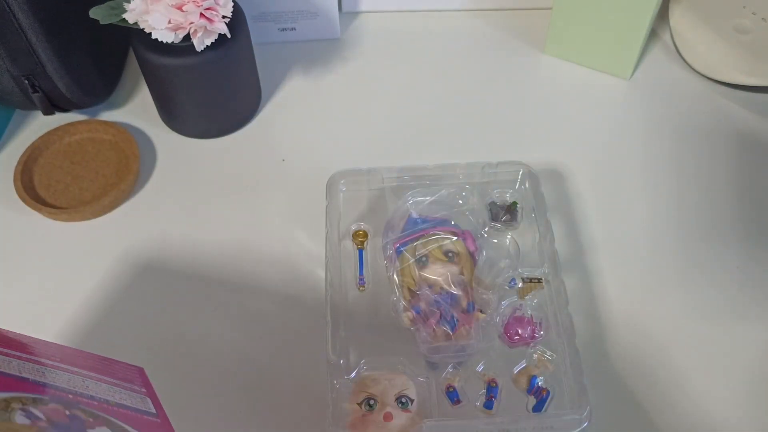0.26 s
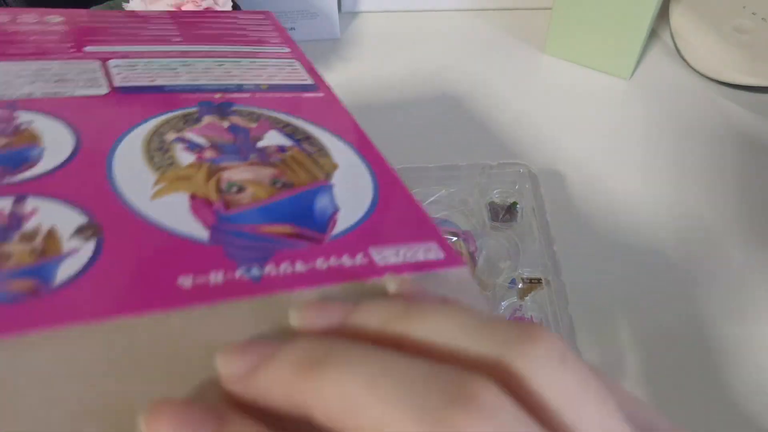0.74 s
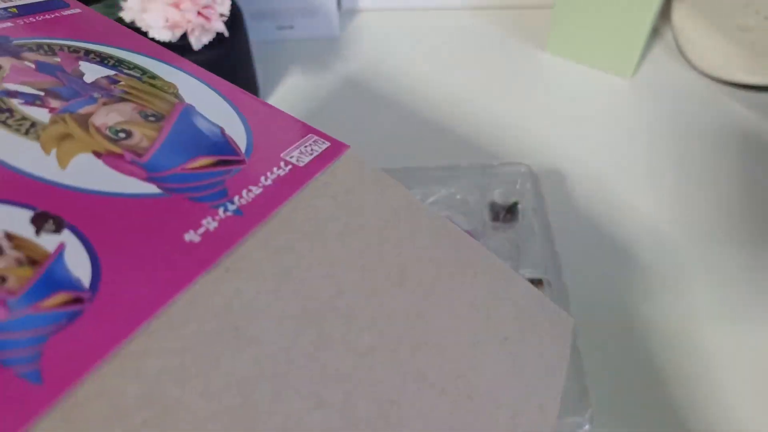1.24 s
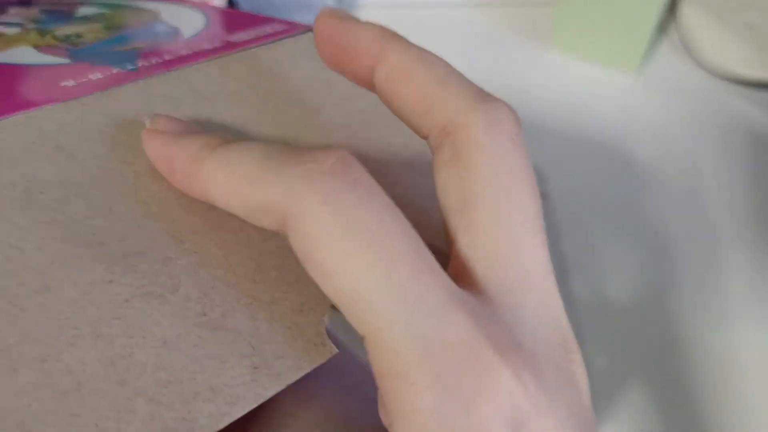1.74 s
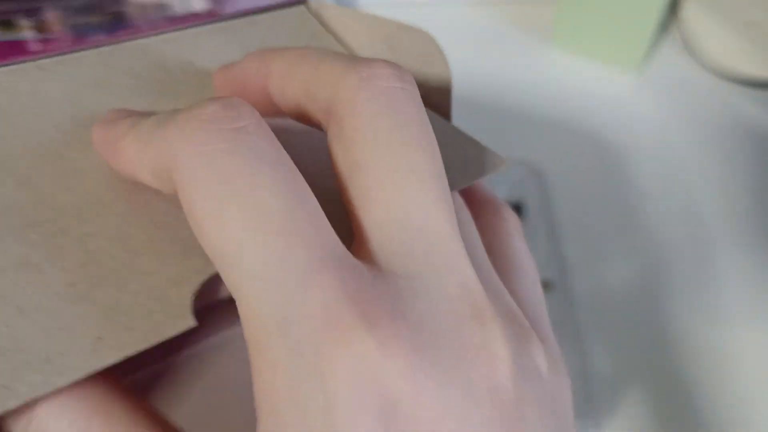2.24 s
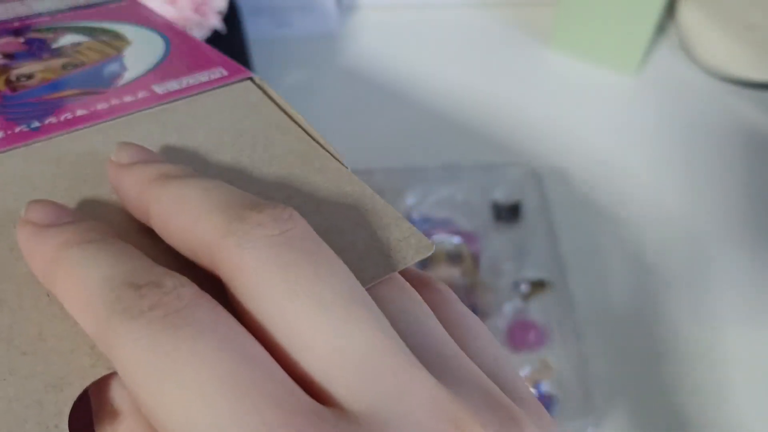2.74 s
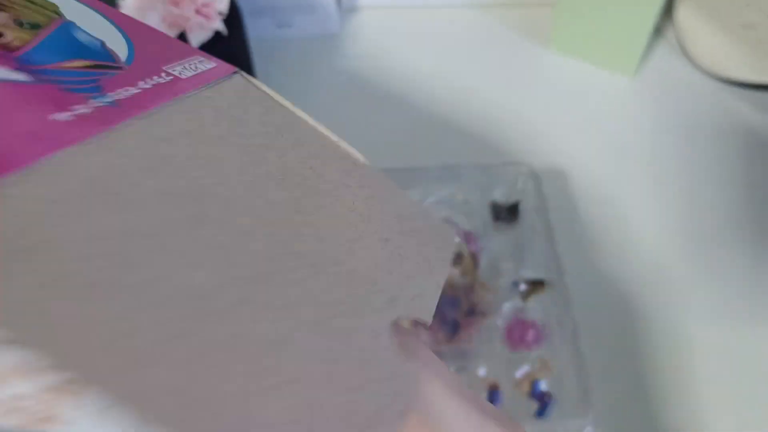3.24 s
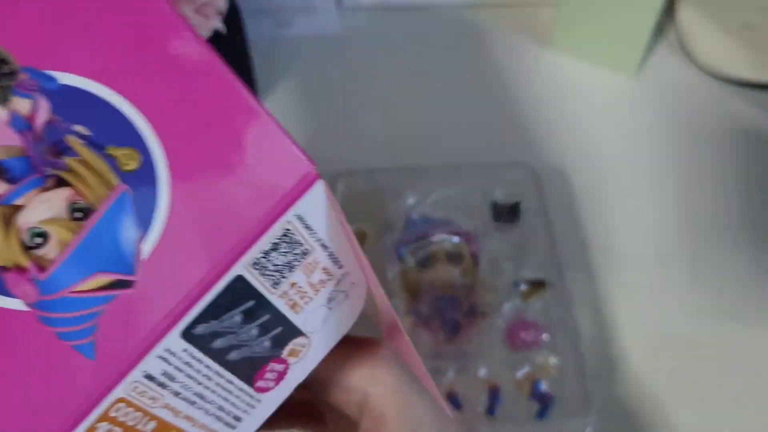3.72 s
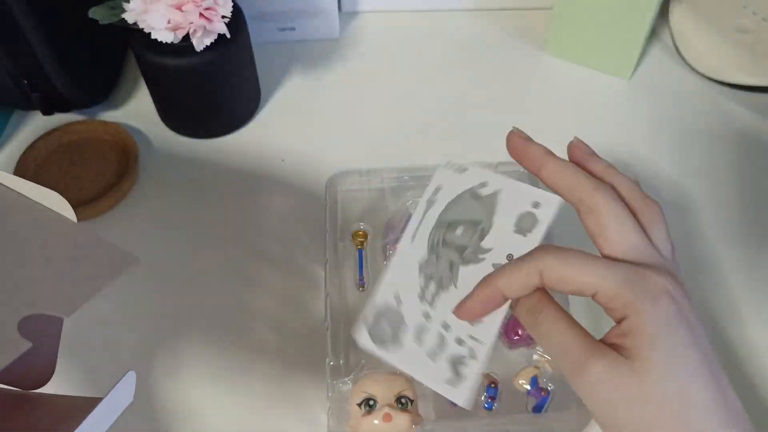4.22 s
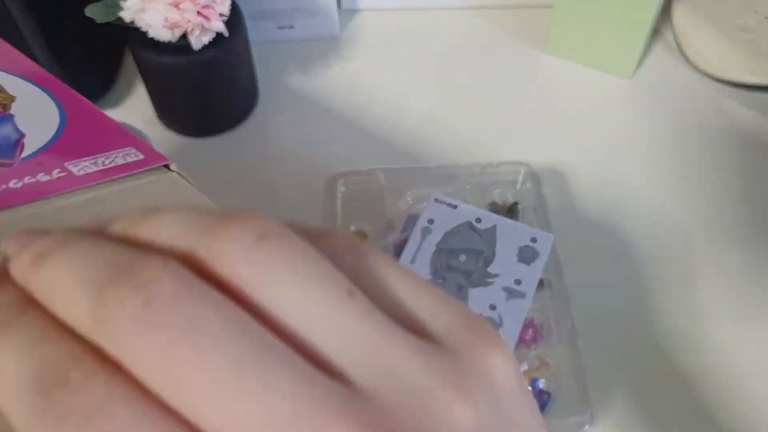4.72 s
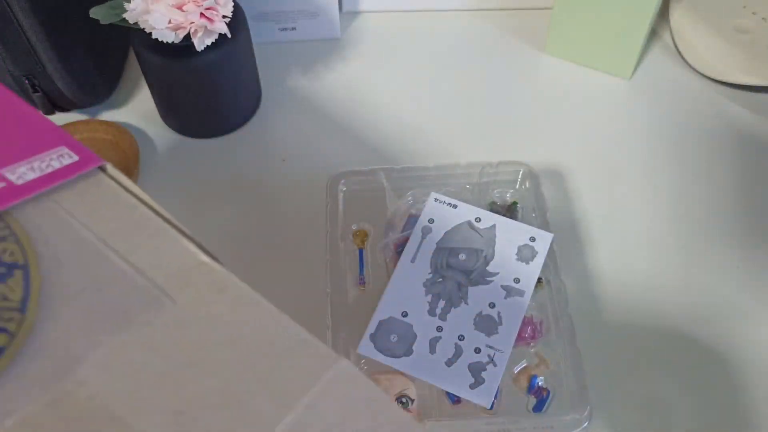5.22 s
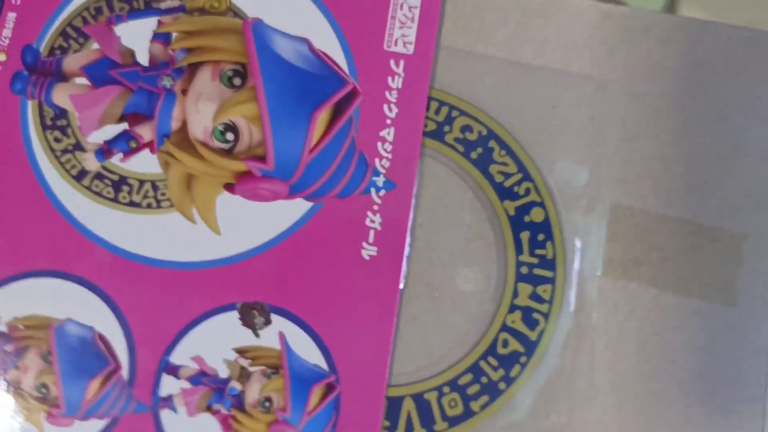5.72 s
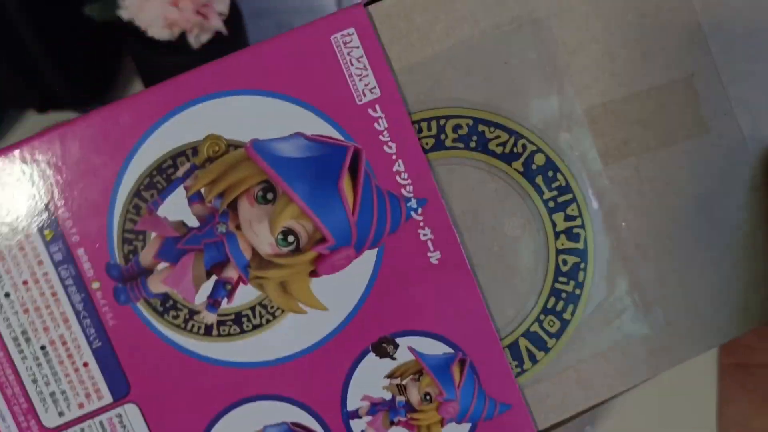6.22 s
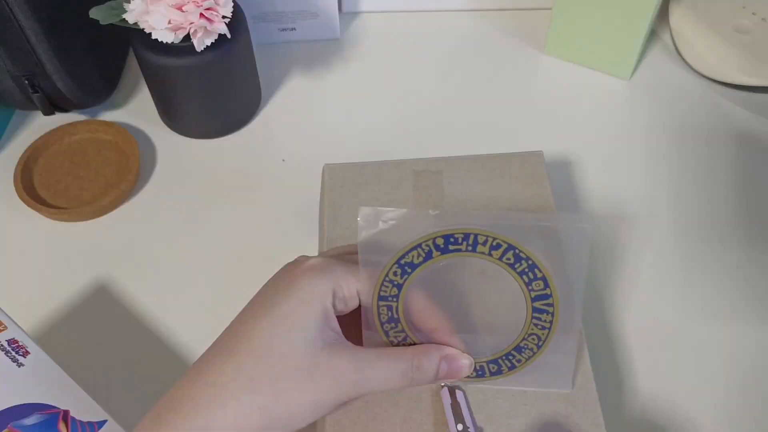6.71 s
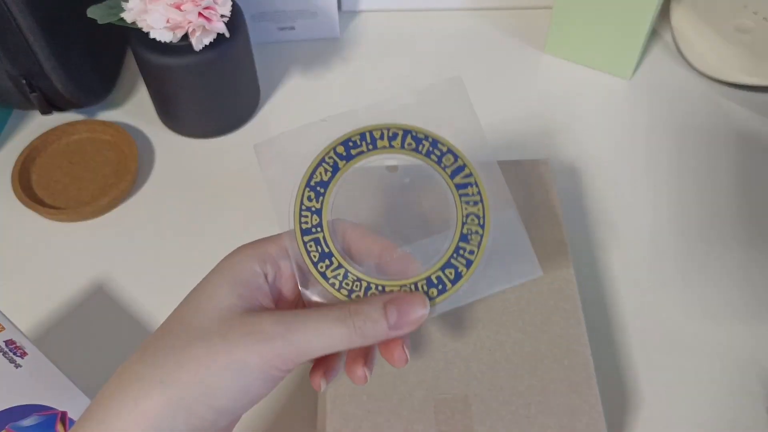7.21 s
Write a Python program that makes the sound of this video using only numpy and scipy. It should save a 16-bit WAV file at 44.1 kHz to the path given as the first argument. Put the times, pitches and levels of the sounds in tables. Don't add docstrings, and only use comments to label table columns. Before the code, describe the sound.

A small, dry, quiet room with low hush and a faint high electric whine; stereo microphones sit close, the box mostly to the right. At once a hollow tap and scrape, with small squeaks of card until 0.4 s. From 0.5 to 1.7 s handling is dense: low boxy booms, desk rumble, dry drags, hard ticks and loud snaps, strongest around 1.0 and 1.6. From 1.8 to 3.5 s flaps catch and crack, with short scuffs and singing notes near 2.4. A hollow shove at 3.55, then squeaks and a bright slide near 4.0. Quiet paper rustles at 4.1-4.4, a clean slap at 4.47. Knocks at 4.7-4.8 and two fast bright slides about 5.0-5.1; a scrape at 5.3, booming bumps and snaps at 5.5-5.9. Softer brushing and presses to 6.5, a scrape at 6.7, scuffs and thumps to 7.1, then faint plastic whispering into near silence by 7.4.

```python
import sys
import numpy as np
from scipy import signal
from scipy.fft import rfft, irfft, next_fast_len
from scipy.io import wavfile
from scipy.ndimage import uniform_filter1d, map_coordinates

SR = 44100
rng = np.random.default_rng(int(sys.argv[2]) if len(sys.argv) > 2 else 0)


def wrap_up_sound(samples):
    columns = np.atleast_2d(samples).T
    tamed = np.clip(columns, -1, 1)
    steps = np.round(tamed * 32767).astype(np.int16)
    wavfile.write(sys.argv[1], SR, steps)


def level_to_linear(level):
    exponent = np.asarray(level, float) / 20
    return 10 ** exponent


N = 328986


def unit(x):
    return x / np.sqrt(np.mean(x ** 2) + 1e-20)


def along(points, hz):
    f, v = np.transpose(points)
    return np.interp(np.log(hz + 1), np.log(f + 1), v)


def curves(rows):
    s, *columns = np.transpose(rows)
    return [np.interp(np.arange(N) / SR, s, column) for column in columns]


def wobble(rate):
    knots = rng.standard_normal(int(N * rate / SR) + 4)
    return map_coordinates(knots, [np.arange(N) * rate / SR])


def filtered(x, response):
    n = x.shape[-1]
    m = next_fast_len(n + 8192)
    return irfft(rfft(x, m) * response(np.fft.rfftfreq(m, 1 / SR)), m)[..., :n]


def modes(table, f):
    total = 0
    for k, (pitch, width, db) in enumerate(table):
        ring = 1j * f * width / (pitch * pitch - f * f + 1j * f * width)
        total = total + (-1) ** k * level_to_linear(db) * ring
    return total


def between(f, lo_hz, hi_hz):
    return 1 / np.sqrt((1 + (lo_hz / (f + 1)) ** 6) * (1 + (f / hi_hz) ** 6))


def swell(t, rise, fall, power):
    return level_to_linear(-9 * np.abs(t / np.where(t < 0, rise, fall)) ** power)


# pitch_hz, level_db (per Hz)
QUIET = [(15, -47), (25, -39), (97, 0), (171, -19), (280, 16.5), (469, -28.5), (730, 14.5), (1350, 8.5),
         (1860, -5.5), (9000, -77.5), (11700, -100), (19800, -120)]
# time_s, pitch_hz, level_db
WHINE = [(0, 7350, -84), (4.6, 7500, -95), (6.69, 7600, -95), (6.7, 7150, -83), (7.46, 7120, -82)]


def room_tone():
    hz, db = curves(WHINE)
    hush = unit(filtered(rng.standard_normal((2, N)), lambda f: level_to_linear(along(QUIET, f))))
    turn = 2 * np.pi * np.cumsum(hz) / SR + .5 * wobble(90)
    whine = level_to_linear(db + 1.5 + 3.5 * wobble(14)) * np.sin(turn)
    return level_to_linear(-47.5) * hush + whine


# pitch_hz, fade_s
ROOM = [(200, 0.13), (2000, 0.11), (10000, 0.057)]


def room(x):
    out, step = np.zeros((2, N + SR)), SR // 4
    for at in range(0, N, step):
        hz, t, z = signal.stft(rng.standard_normal((2, step)), SR, nperseg=256)
        fade = level_to_linear(-60 * t / along(ROOM, hz)[:, None])
        tail = signal.istft(z * fade, SR, nperseg=256)[1]
        wet = signal.fftconvolve(x[:, at:at + step], tail / np.linalg.norm(tail[0]), axes=1)
        out[:, at + 100:][:, :wet.shape[1]] += wet
    return out[:, :N]


# time_s, left_late_ms, left_minus_right_db
PLACE = [(0, .32, -1.5), (.7, .32, -4), (1.3, .32, -4.5), (1.7, .32, -3), (2.8, .32, -4.5), (3.2, .33, -7),
         (3.55, .32, -2), (3.6, 0, -2), (3.85, 0, -1), (3.9, .32, -2), (4.03, .32, -2), (4.08, 0, -2),
         (4.6, 0, -1), (4.66, .34, -3), (5.38, .34, -1), (5.43, 0, -.5), (7.46, 0, -.5)]
# pitch_hz, level_db
EAR = [(100, -3), (700, -2), (3000, .7), (8000, -7), (15000, -8)]


def placed(pair, lag):
    late_ms, pan_db = curves(PLACE)
    left = map_coordinates(pair[0], [np.arange(N) - lag * late_ms * SR / 1000])
    left = filtered(left, lambda f: level_to_linear(along(EAR, f)))
    return np.array([left * level_to_linear(pan_db / 2), pair[1] * level_to_linear(-pan_db / 2)])


def spread(pair, apart):
    return np.cos(apart) * pair[0] + np.sin(apart) * np.outer([1, -1], pair[1])


# pitch_hz, level_db (per Hz)
RUMBLE = [(13, -49.5), (22, -38), (65, -9), (97, -3), (119, -5.5), (170, -13.5), (220, -28), (370, -120)]
# crest_s, level_db
JOLTS = [(0.069, -40.5), (.3, -58), (.44, -48), (1.07, -35), (2.6, -39.5), (3.05, -44), (5.5, -39),
         (6.08, -36.5), (6.7, -53), (7, -40), (7.15, -44), (7.43, -46), (1.8, -39.5), (2.2, -48),
         (3.35, -47), (4.52, -44.5), (0.557, -28.5), (0.7, -27), (0.867, -35), (0.964, -38), (1.19, -27),
         (1.334, -31.5), (1.509, -26.5), (1.627, -24), (1.988, -32.5), (3.548, -36.5), (4.039, -36.5),
         (4.385, -36.5), (4.813, -31), (5.148, -31.5), (5.621, -33), (5.708, -27), (5.892, -27.5),
         (6.325, -36), ]


def desk_rumble():
    t = np.arange(0, N, 64) / SR
    jolts = level_to_linear(-57) + sum(level_to_linear(db + 4.5) * swell(t - s, 0.024, 0.019, power=0.88) for s, db in JOLTS)
    rumble = filtered(rng.standard_normal((2, N)), lambda f: level_to_linear(along(RUMBLE, f)))
    rumble /= np.sqrt(np.abs(uniform_filter1d(rumble[0] ** 2, size=2500)) + 1e-12)
    return np.interp(np.arange(N) / SR, t, jolts) * unit(rumble)


# pitch_hz, width_hz, level_db
CAVITY = [(245, 43.6, 2.5), (350.4, 100, -2.5)]


def box_hum(panel):
    drive = rng.standard_normal((2, N)) * level_to_linear(2.5 * wobble(25))
    hum = unit(filtered(drive, lambda f: modes(CAVITY, f) * between(f, 100, 420)))
    lingering = signal.lfilter([1 / 900], [1, 1 / 900 - 1], panel)
    return level_to_linear(-13.5) * lingering ** 0.67 * hum


# crest_s, level_db, boom_hz
TAPS = [(.047, -9.5, 263), (.353, -16, 289), (.503, -21.5, 287), (1.585, -18.5, 250), (1.645, -17, 255),
        (3.545, -19.5, 229), (2.389, -18.5, 286), (3.011, -21.5, 279), (3.427, -13, 232), (3.795, -21, 265),
        (3.918, -19.5, 267), (5.742, -18, 315), (4.845, -14, 245), (5.69, -18, 245), (2.445, -25, 263),
        (2.487, -19, 266), (2.52, -26, 324), (2.59, -24, 300), (2.31, -26, 260), (2.895, -23, 310),
        (2.98, -38, 298), (3.06, -18, 257), (1.1, -21.5, 312), (1.215, -17.5, 310), (6.313, -14, 380),
        (6.661, -16.5, 256)]
# crest_s, level_db, boom_hz
SHOVES = [(.483, -19, 336), (1.144, -22.5, 336), (1.184, -18, 250), (1.315, -17, 282), (1.47, -16, 256),
          (1.52, -18, 252), (1.612, -12.5, 232), (1.762, -22, 381), (2.875, -23, 252), (3.56, -11, 220),
          (4.712, -21, 293), (4.799, -13, 260), (5.14, -24, 376), (5.721, -12, 211), (5.82, -20, 246),
          (6.25, -16.5, 236.4)]
# crest_s, level_db, boom_hz
SQUEEZES = [
    (.602, -18, 277),
    (.677, -16, 257),
    (.852, -14, 265),
    (.992, -19.5, 287),
    (1.69, -17.5, 361),
    (1.988, -18, 290),
    (3.826, -21, 278),
    (5.492, -22, 275),
    (6.067, -19.5, 246),
    (6.143, -21, 253),
]
# pushes, rise_s, fall_s
PUSH_KINDS = [
    (TAPS, 0.011, 0.0029),
    (SHOVES, 0.0026, 0.022),
    (SQUEEZES, 0.016, 0.008),
]


def pushes():
    out, lead = np.zeros((2, N + SR)), SR // 8
    t = np.arange(-lead, lead) / SR
    drift = 2.0 * np.array([wobble(30), wobble(30)])
    for rows, rise, fall in PUSH_KINDS:
        for s, db, hz in rows:
            at = np.clip(round(s * SR) + np.arange(-lead, lead), 0, N - 1)
            turn = 2 * np.pi * hz * t + drift[:, at]
            swing = np.sin(turn) + 0.21 * np.sin(1.9 * turn) + 0.09 * np.sin(2.8 * turn)
            boom = level_to_linear(db + 1.5) * swell(t, rise, fall, power=3.6) * swing
            out[:, round(s * SR):][:, :len(t)] += boom
    return out[:, lead:lead + N]


# time_s, then its rings as pitch_hz, width_hz, level_db
SLAP = (4.4735, [(550, 820, -8), (1750, 680, -4), (5460, 2500, -21.5)])


def slap():
    s, body = SLAP
    start = round(s * SR)
    blow, t = np.zeros((2, N)), np.arange(900) / SR
    blow[:, start:][:, :len(t)] = 0.023 * rng.standard_normal((2, len(t))) * level_to_linear(-60 * t / 0.004)
    blow[0, start + np.array([0, 62])] += [-1, -.35]
    return level_to_linear(31.5) * filtered(blow, lambda f: modes(body, f))


# crest_s, half_length_s, level_db, from_hz, to_hz
GLIDES = [(0.118, 0.02, -28, 3760, 3320), (0.157, 0.0516, -35, 447, 776), (0.158, 0.021, -26, 2580, 2270),
          (0.213, 0.012, -24, 1290, 1185), (0.212, 0.012, -29, 2780, 2760), (0.365, 0.018, -33, 3020, 2870),
          (1.571, 0.016, -28, 2795, 2830), (1.961, 0.008, -30, 2100, 2390), (3.383, 0.034, -25, 2610, 2430),
          (3.391, 0.024, -27, 1595, 1750), (3.606, 0.015, -29, 2600, 3080), (3.808, 0.047, -30, 2995, 2630),
          (3.973, 0.04, -29, 2736, 3000), (4.904, 0.032, -27.5, 1950, 1787),
          (4.947, 0.012, -33, 2570, 3000), (5.113, 0.031, -29, 2780, 3320), (5.513, 0.021, -29, 1584, 1750),
          (5.923, 0.0091, -37.5, 3250, 3470), (6.632, 0.019, -37, 2740, 2800),
          (6.779, 0.012, -32.5, 3110, 3050), (6.803, 0.032, -39.5, 4150, 3890),
          (6.826, 0.027, -32, 2880, 3063)]


def gliding():
    out, lead = np.zeros((2, N + SR)), SR // 10
    t = np.arange(-lead, lead) / SR
    for s, half, db, from_hz, to_hz in GLIDES:
        pole = np.exp(-np.pi * 0.11 * from_hz / SR)
        slow = signal.lfilter([1], [1, -2 * pole, pole ** 2], rng.standard_normal((2, 2, len(t))))
        turn = 2 * np.pi * np.cumsum(np.interp(t, [-half, half], [from_hz, to_hz])) / SR
        tone = unit(slow[0] * np.cos(turn) + slow[1] * np.sin(turn))
        out[:, round(s * SR):][:, :len(t)] += level_to_linear(db) * swell(t, half, half, power=4.3) * tone
    return out[:, lead:lead + N]


# crest_s, half_length_s, level_db, pitch_hz
SINGING = [
    (0.146, 0.021, -24, 2510),
    (0.226, 0.0048, -20.5, 706),
    (2.375, 0.016, -23.5, 1107),
    (2.45, 0.027, -27, 2200),
    (2.444, 0.019, -25.5, 1030),
    (3.838, 0.059, -27.5, 2070),
    (3.938, 0.038, -23, 2655),
    (6.831, 0.025, -34, 1970),
    (7.1, 0.0089, -21.5, 1130),
]


def singing():
    out, lead = np.zeros((2, N + SR)), SR // 8
    t = np.arange(-lead, lead) / SR
    for s, half, db, hz in SINGING:
        friction = rng.standard_normal((2, len(t)))
        tone = unit(filtered(friction, lambda f: modes([(hz, 0.1 * hz, 0)], f) ** 2))
        out[:, round(s * SR):][:, :len(t)] += level_to_linear(db) * swell(t, half, half, power=6.8) * tone
    return out[:, lead:lead + N]


# time_s, peak_db, ring_hz
TICKS = [(.014, 0, 764), (.025, -8.5, 2400), (6.261, -28, 2900), (0.919, -3, 2700), (0.957, 6.5, 2320),
         (0.975, -1, 2470), (0.996, -18, 1130), (1.056, -24, 2970), (1.072, -29, 1710), (1.082, -15, 1730),
         (1.094, -15, 1740), (1.11, -1, 2300), (1.128, -28, 2660), (1.177, -4, 2610), (1.207, 0, 2710),
         (1.211, -20, 1670), (1.226, -13, 1090), (1.385, -13.5, 2780), (3.572, -24, 1170),
         (3.594, -1.5, 2750), (3.91, -7, 2820), (3.939, -16, 2640), (3.96, 5, 2610), (3.981, -17, 2920),
         (5.499, -10, 1670), (5.579, -2, 719), (5.618, -15, 886), (5.712, -26, 837), (5.815, -16, 1300),
         (5.843, -1, 1250), (6.94, -4, 2000), (6.992, -1, 1250), (7.033, -19, 1500), (7.049, -28, 1520),
         (.476, -5.5, 945), (1.037, -7, 3030), (1.127, -27, 2660), (1.424, -27, 1090), (1.604, 6.5, 2830),
         (2.684, -3.5, 2600), (2.842, -1.5, 2600), (3.035, 5, 2370), (3.042, -13, 2000), (3.473, -7, 880),
         (4.702, -24, 2440), (4.726, -6, 2410), (5.678, -15, 2550)]


def ticks():
    out, t = np.zeros((2, N + SR)), np.arange(SR // 50) / SR
    onset = 1 - np.exp(-t / 0.00008)

    def ring(hz, cycles):
        return np.sin(2 * np.pi * hz * t) * level_to_linear(-60 * t * hz / cycles) * onset

    edge = level_to_linear(-17.5) * ring(5200, 1.4)
    for s, db, hz in TICKS:
        out[0, round(s * SR):][:len(t)] += level_to_linear(db) * (ring(hz, 5.4) + edge)
    return out[:, :N]


# time_s, peak_db, ring_hz, fade_s (to -60 dB)
CRACKS = [(.957, -10, 2640, 0.023), (.988, -5, 1750, 0.012), (1.205, -16, 960, 0.018),
          (1.605, -9.5, 2830, 0.043), (1.227, -16, 2520, .015), (1.818, -10, 1077, 0.036),
          (2.078, -15.5, 2450, 0.091), (2.57, -8.5, 1080, 0.047), (3.036, -6, 1690, 0.06),
          (3.17, -19, 880, .029), (3.572, -21, 890, 0.011), (4.284, -18.5, 1900, 0.021),
          (4.333, -19.5, 1477, 0.097), (4.79, -10.5, 2140, 0.035), (5.579, -12, 714, 0.0091),
          (5.842, -18, 1210, 0.02), (5.62, -12.5, 810, 0.011), (5.814, -14.5, 1440, 0.033),
          (6.911, -33, 3160, 0.013)]
# time_s, peak_db, ring_hz, fade_s
CATCHES = [(.31, -12, 2830, 0.045), (1.568, -11.5, 2840, 0.026), (1.795, -13.5, 2370, 0.02),
           (1.959, -9, 1066, 0.053), (2.149, -8.5, 1160, 0.11), (2.192, -16, 3000, 0.016),
           (2.429, -9, 2140, 0.086), (2.681, -9, 1070, 0.02), (3.324, -9, 1090, 0.029),
           (5.256, -16, 870, 0.1), (5.537, -13.5, 855, 0.067), (5.68, -13, 2610, 0.015),
           (6.939, -11, 1380, 0.026), (7.031, -15, 1500, 0.031)]
# time_s, peak_db, ring_hz, fade_s
KNOCKS = [(.337, -13, 1890, 0.074), (.476, -10.5, 1180, 0.02), (.496, -14.5, 910, 0.1),
          (.578, -11.5, 1150, 0.021), (1.082, -2, 1790, 0.011), (1.127, -8.5, 2550, 0.014),
          (1.175, -12.5, 2620, 0.026), (1.314, -12.5, 2600, 0.11), (1.424, -8, 1090, 0.011),
          (2.307, -10, 1140, 0.013), (3.256, -13.5, 1750, 0.025), (3.471, -15, 890, 0.026),
          (4.701, -7, 2490, 0.034), (4.727, -6.5, 2540, 0.022), (5.711, -11, 785, 0.0098),
          (6.039, -11.5, 1420, 0.089), (7.244, -31.5, 2760, 0.057)]
# time_s, peak_db, ring_hz, fade_s
SCUFFS = [
    (.911, -9, 2650, 0.061),
    (1.032, -11, 2840, .035),
    (2.817, -11.5, 1013, 0.022),
    (2.838, -9, 1790, 0.069),
    (2.871, -10.5, 1800, 0.024),
    (2.887, -13, 1660, 0.023),
    (3.005, -15, 1020, 0.039),
    (6.982, -10, 1175, 0.13),
]
# time_s, peak_db, ring_hz, fade_s
THUMPS = [
    (6.742, -20.5, 1270, 0.011),
    (7.091, -18, 1060, 0.12),
    (7.11, -9, 1190, 0.049),
]
# snaps, crispness_db, rise_s, top_hz, ring_width (share of its pitch)
SNAP_KINDS = [
    (CRACKS, -24.5, 0.0011, 3180, 0.055),
    (CATCHES, -30.5, 0.0014, 3380, 0.074),
    (KNOCKS, -41.5, 0.0013, 3000, 0.084),
    (SCUFFS, -33, 0.0047, 3200, 0.079),
    (THUMPS, -40, 0.0047, 2770, 0.18),
]


def snaps():
    out, t = np.zeros((2, N + SR)), np.arange(SR // 10) / SR
    events = sorted((*row, *kind) for rows, *kind in SNAP_KINDS for row in rows)
    for s, db, hz, t60, crisp_db, rise, top_hz, width in events:
        fade = level_to_linear(-60 * t / np.clip(t60, .004, .09))
        onset = (1 - np.exp(-1.6 * t / rise)) ** 2
        crackle = rng.standard_normal((2, len(t))) * fade * onset
        crackle[0, max(40, round(rise * SR))] += 1.07 * level_to_linear(np.minimum(0.61 * (crisp_db + 30.0), 4))

        def ring(f):
            struck = modes([(hz, width * hz, 0)], f)
            broad = modes([(3000, 3900, 0.0062)], f)
            return struck + 0.29 * modes(PANELS, f) + 0.18 * broad + 0.5 * modes(CAVITY, f)

        body = filtered(crackle, lambda f: ring(f) * between(f, 180, top_hz) ** 2)
        crisp = filtered(crackle * level_to_linear(-60 * t / 0.012), lambda f: level_to_linear(along(FIBRES, f)))
        snap = body / np.abs(body[0]).max() + level_to_linear(crisp_db + 10.5) * crisp / np.abs(crisp[0]).max()
        out[:, round(s * SR):][:, :len(t)] += level_to_linear(db) * snap
    return out[:, :N]


# time_s, scrape_db, panel_db
RUB = [(0, -39, -38), (1, -50, -30.5), (1.15, -52, -14), (1.4, -62, -37), (2.6, -60, -37),
       (3.55, -58.5, -52), (3.64, -42, -54), (4.1, -51, -50), (4.74, -87, -27.5), (4.86, -42, -33),
       (5.15, -60, -22), (5.22, -64, -64), (5.4, -40, -40), (5.78, -52, -50), (6.55, -66.5, -35),
       (6.9, -48, -35.5), (7.2, -71, -47), (7.46, -63, -37.5)]
# crest_s, rise_s, fall_s, scrape_db
SCRAPES = [(.135, 0.037, 0.073, -21.5), (1.423, 0.056, 0.017, -22), (1.672, 0.023, 0.036, -21),
           (2.152, 0.061, 0.0077, -23.5), (2.441, 0.022, 0.12, -25.5), (3.041, 0.013, 0.1, -29.5),
           (3.385, 0.025, 0.052, -24.5), (5.289, 0.027, 0.014, -17), (6.673, 0.028, 0.013, -19),
           (6.811, 0.046, 0.049, -32.5), (6.92, 0.017, 0.043, -25.5)]
# crest_s, rise_s, fall_s, scrape_db
SLIDES = [
    (3.986, 0.074, 0.037, -17.5),
    (4.982, 0.092, 0.03, -17),
    (5.096, 0.091, 0.05, -18),
]
# crest_s, rise_s, fall_s, scrape_db
DRAGS = [(.663, 0.087, 0.08, -29.5), (.913, 0.14, 0.12, -28.5), (1.054, 0.0052, 0.01, -20),
         (1.325, 0.13, 0.035, -30), (1.759, 0.018, 0.018, -25), (1.828, 0.042, 0.13, -27),
         (2.196, 0.018, 0.0099, -20), (2.385, 0.029, 0.0099, -20), (2.515, 0.014, 0.039, -20),
         (3.267, 0.012, 0.093, -30.5), (3.689, 0.033, 0.079, -25), (4.824, 0.035, 0.033, -19.5),
         (5.623, 0.027, 0.081, -32), (6.389, 0.018, 0.019, -36.5), (7.052, 0.024, 0.0078, -27)]
# crest_s, rise_s, fall_s, scrape_db
PRESSES = [(.034, 0.028, 0.012, -26), (1.1, 0.022, 0.038, -31.5), (1.966, 0.039, .008, -56),
           (3.595, 0.093, 0.014, -33.5), (4.338, 0.012, 0.059, -40.5), (4.494, 0.024, 0.041, -41),
           (5.544, 0.081, 0.057, -31), (5.686, 0.021, 0.11, -40), (5.821, 0.0033, 0.056, -36.5),
           (6.05, 0.034, 0.03, -26), (6.243, 0.015, 0.088, -29), (6.535, 0.02, 0.0036, -38.5),
           (7.459, 0.023, .006, -54.5)]
# crest_s, rise_s, fall_s, scrape_db
BRUSHES = [(.03, 0.083, .02, -42), (.285, 0.075, 0.064, -32), (.532, 0.038, 0.037, -35),
           (.66, 0.036, .015, -36.5), (.905, .03, 0.0099, -33), (.98, 0.01, 0.026, -35),
           (1.26, .04, 0.092, -40.5), (1.405, 0.018, 0.017, -46), (1.53, 0.082, 0.083, -28),
           (1.675, .015, 0.017, -51), (1.962, 0.008, 0.015, -31.5), (2.274, 0.039, 0.039, -34),
           (2.36, 0.022, 0.022, -32.5), (3.83, 0.03, 0.085, -32.5), (5.93, 0.053, 0.042, -42.5),
           (6.13, 0.064, 0.13, -30.5), (6.243, 0.027, 0.017, -29.5)]
# crest_s, rise_s, fall_s, scrape_db
RUSTLES = [
    (4.107, 0.015, 0.035, -49.5),
    (4.196, 0.035, 0.015, -52.5),
    (4.225, .015, .015, -51),
    (4.345, 0.0073, 0.018, -46.5),
    (4.43, 0.004, 0.034, -66),
    (4.29, 0.031, 0.028, -50),
    (7.252, 0.0033, 0.017, -64),
]
# crest_s, rise_s, fall_s, scrape_db
HUSHES = [
    (5.42, 0.0045, 0.016, -64.5),
    (7.19, 0.048, 0.033, -88),
    (7.285, 0.017, 0.034, -72),
    (7.445, 0.044, 0.033, -76),
]
# strokes, then panel_db, hiss_db, air_db (all over the scrape)
STROKE_KINDS = [
    (SCRAPES, -5.5, -25, -29),
    (SLIDES, -7, -23.5, -23.5),
    (DRAGS, -2.1, -29, -35.5),
    (PRESSES, 10.2, -24, -33),
    (BRUSHES, -8.5, -14, -15),
    (RUSTLES, 0, -.6, .7),
    (HUSHES, -6, 4.6, 20),
]
NARROWING = np.array([[1], [1], [1.3], [2.2]])


def stroke_gains():
    t = np.arange(0, N, 32) / SR
    bed = level_to_linear(np.array(curves(RUB))[:, ::32])
    energy = np.array([bed[0], bed[1], level_to_linear(-25) * bed[0], level_to_linear(-48) * bed[0]]) ** 2
    for rows, panel_db, hiss_db, air_db in STROKE_KINDS:
        for s, rise, fall, db in rows:
            level = level_to_linear(db + np.array([[0], [panel_db], [hiss_db], [air_db]]))
            energy += (level * swell(t - s, rise, fall, power=3.07) ** NARROWING) ** 2
    return [np.interp(np.arange(N) / SR, t, np.sqrt(e)) for e in energy]


def patchy(x, depth_db):
    z = signal.stft(x, nperseg=512)[2]
    field = uniform_filter1d(rng.standard_normal(z.shape[-2:]), size=3, axis=0)
    field = uniform_filter1d(field, size=8, axis=1)
    return signal.istft(z * level_to_linear(depth_db * unit(field)), nperseg=512)[1][..., :N]


# pitch_hz, level_db (per Hz)
CARD = [(260, -42.5), (450, 2.5), (723, -7), (840, -3), (1100, -5), (1540, -10), (1680, -7), (2870, -8),
        (5000, -19.5), (6500, -25.5), (11000, -120)]
# pitch_hz, width_hz, level_db
PANELS = [(734, 20, -1), (1090, 84, 2.5), (1750, 64, -1), (2830, 160, -0.5)]
# pitch_hz, level_db (per Hz)
FIBRES = [(2530, -1), (4300, -3), (5430, -6.5), (6050, -6), (7980, -12.5), (8740, -12.5), (9960, -22),
          (11500, -12.5), (15700, -28.5)]


def rubbing(scrape, panel, hiss, air):
    clumps = level_to_linear(1.6 * wobble(60) + 3.3 * wobble(250))
    sizes = level_to_linear(2.5 * np.minimum(rng.exponential(size=N), 4.5))
    slips = rng.standard_normal((2, N)) * sizes
    flaring = patchy(slips * clumps, depth_db=3.6)
    smooth = patchy(slips * clumps ** .5, depth_db=2.8)

    def layer(lo_hz, hi_hz):
        card = lambda f: level_to_linear(along(CARD, f)) * (1.9 + np.abs(modes(PANELS, f)))
        return unit(filtered(flaring, lambda f: card(f) * between(f, lo_hz, hi_hz)))

    def fine(lo_hz, hi_hz):
        return unit(filtered(smooth, lambda f: level_to_linear(along(FIBRES, f)) * between(f, lo_hz, hi_hz)))

    body = level_to_linear(-1.85) * scrape * layer(1280, 4050) + level_to_linear(-8.5) * panel * layer(602, 596)
    flicker = level_to_linear(1.8 * wobble(22) + 1.2 * wobble(70))
    surface = level_to_linear(5.0) * hiss * np.sqrt(flicker) * fine(3300, 7960)
    surface += level_to_linear(-2.5) * air * flicker * fine(13000, 19000)
    return body, surface


def scene():
    gains = stroke_gains()
    body, surface = rubbing(*gains)
    card = spread(body, apart=.42) + spread(surface, apart=.72)
    card += spread(snaps() + slap() + singing(), apart=.33)
    card += spread(ticks() + gliding(), apart=0.62)
    box = spread(box_hum(gains[1]) + desk_rumble() + pushes(), apart=0.34)
    near = placed(card, lag=0.96) + placed(box, lag=0.68)
    return near + level_to_linear(-10.0) * room(near) + room_tone()


def roll_off(x):
    return signal.sosfilt(signal.butter(12, 16660, fs=SR, output="sos"), x)


def record(dry):
    clipped = dry / (1 + np.abs(dry) ** 8) ** (1 / 8)
    limited = filtered(clipped, lambda f: np.clip((15950 - f) / 250, 0, 1))
    return roll_off(limited)


dry = scene()
out = record(dry)
wrap_up_sound(out)
```